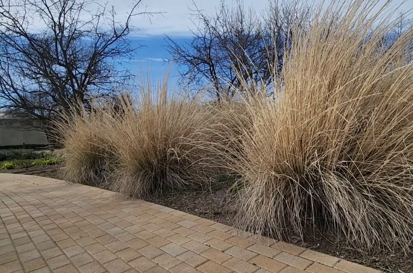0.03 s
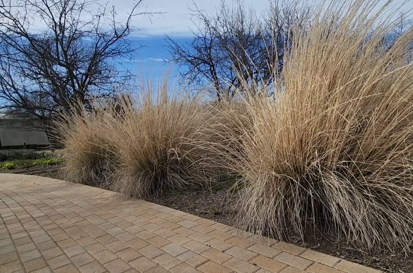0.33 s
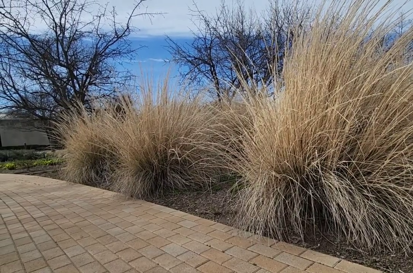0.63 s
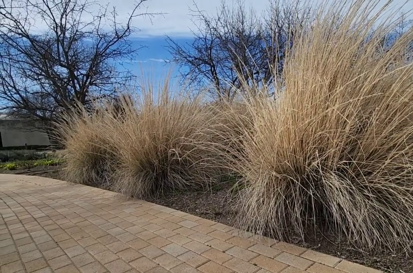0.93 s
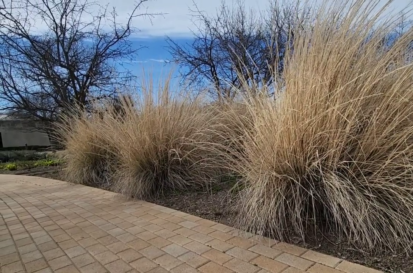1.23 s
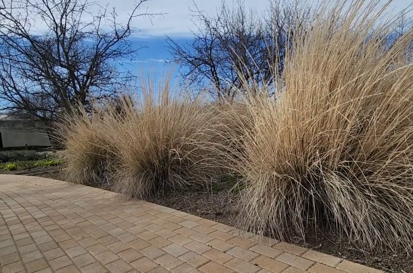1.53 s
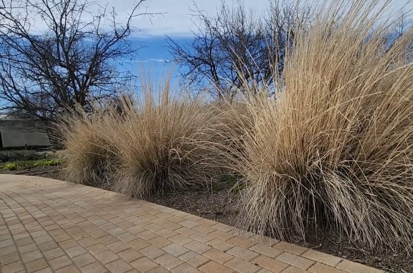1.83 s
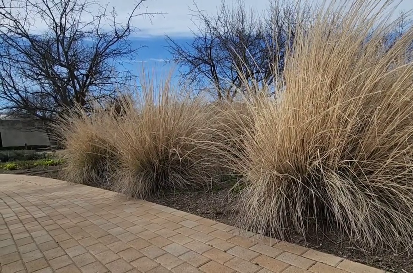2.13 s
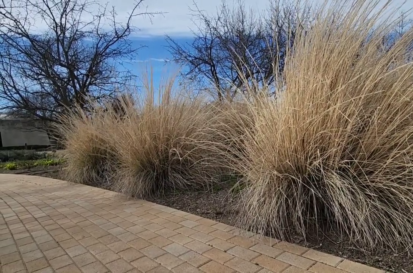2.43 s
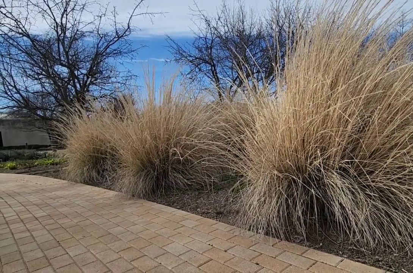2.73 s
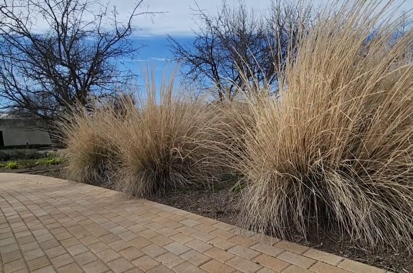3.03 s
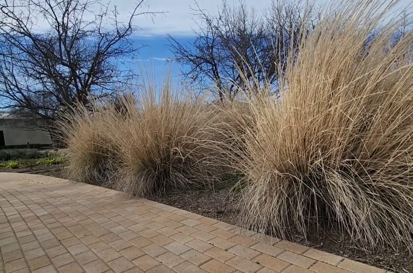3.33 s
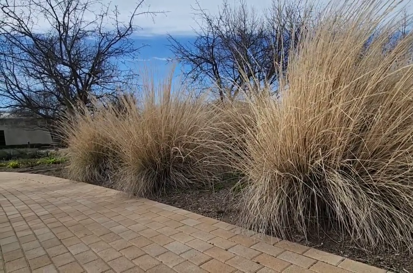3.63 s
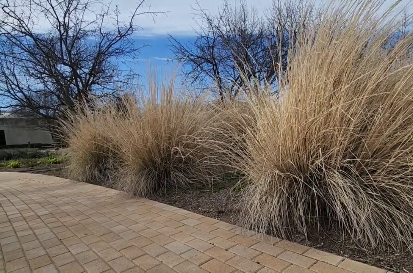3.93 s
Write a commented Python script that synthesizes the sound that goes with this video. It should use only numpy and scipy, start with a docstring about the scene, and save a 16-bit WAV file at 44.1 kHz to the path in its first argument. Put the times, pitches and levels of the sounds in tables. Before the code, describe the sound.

Dry grass hisses and crackles in light wind, stalks ticking, with faint traffic far away.

```python
"""Breeze in dry garden grass

Tall dry grass on the right hisses and crackles, louder as the wind picks up, and its stalks tick
as they snap against each other. A few faint knocks sound close by. Behind it all lie a thin hiss,
a low rumble, a wash of distant air and traffic, a far engine's fading drone and two faint whines."""
import sys
import numpy as np
from scipy import signal
from scipy.fft import rfft, irfft, next_fast_len
from scipy.io import wavfile
from scipy.ndimage import uniform_filter1d, map_coordinates

SR = 44100
rng = np.random.default_rng(int(sys.argv[2]) if len(sys.argv) > 2 else 0)


def int16_out(signal):
    """Quantize to a 16-bit WAV file."""
    q = np.round(np.clip(np.atleast_2d(signal).T, -1, 1) * 32767)
    wavfile.write(sys.argv[1], SR, q.astype(np.int16))


N = 176400  # 4 seconds


def amp(db):
    """Turn decibels into a factor to multiply by."""
    return 10 ** (np.asarray(db) / 20)


def unit(x):
    """Scale a signal to an average strength (rms) of 1."""
    return x / np.sqrt(np.mean(x ** 2) + 1e-20)


def along(points, hz):
    """Read between (f/Hz, value) points, with octaves evenly spaced."""
    f, v = np.transpose(points)
    return np.interp(np.log(hz + 1), np.log(f + 1), v)


def curve(rows):
    """Join (t/s, value) points into one value per sample."""
    return np.interp(np.arange(N) / SR, *np.transpose(rows))


def wobble(rate):
    """A smooth curve through `rate` random values a second."""
    return map_coordinates(rng.standard_normal(512), [np.arange(N) * rate / SR], mode="wrap")


def filtered(x, response):
    """Scale each frequency in x by response(hz)."""
    m = next_fast_len(N + SR // 2)
    return irfft(rfft(x, m) * response(np.fft.rfftfreq(m, 1 / SR)), m)[..., :N]


def pan(side_db):
    """Left and right gains of constant power; below 0 dB leans right."""
    gains = amp(np.array([[.5], [-.5]]) * side_db)
    return gains / np.sqrt(np.mean(gains ** 2, axis=0))


def patchy_noise(depth_db):
    """Two noises that share louder and softer patches in time and frequency."""
    cells = signal.stft(rng.standard_normal((2, N)), nperseg=512)[2]
    patches = uniform_filter1d(rng.standard_normal(cells.shape[1:]), size=14, axis=0)
    patches = unit(uniform_filter1d(patches, size=14, axis=1))
    return unit(signal.istft(cells * amp(depth_db * patches), nperseg=512)[1][:, :N])


def far_noise(spectrum, patchy_db):
    """Shaped noise of strength 1 reaching both ears from far off."""
    # how alike the two ears' sounds are: f/Hz, likeness (1 same, -1 opposite)
    likeness = [(60, .975), (140, .955), (250, .82), (350, .66), (470, .32), (660, .38), (820, 0),
                (1000, -.52), (1380, -.5), (1620, 0), (1900, .26), (2700, -.05), (4000, 0)]
    # where far sounds lean: f/Hz, left minus right/dB
    far_side = [(60, 0.57), (270, 0.084), (450, -1.4), (2000, -1.8)]

    def mid_and_side(hz):
        """Split each frequency into a shared and an opposite part."""
        angle = np.arccos(np.clip(along(likeness, hz), -1, 1)) / 2
        return amp(along(spectrum, hz)) * [np.cos(angle), np.sin(angle)]

    mid, side = filtered(patchy_noise(patchy_db), mid_and_side)
    ears = np.array([mid + side, mid - side])
    return unit(filtered(ears, lambda hz: pan(along(far_side, hz))))


def tone(hz, wander_hz, rate):
    """A pure tone of strength 1 with a wandering pitch."""
    pitch = hz + wander_hz * wobble(rate)
    return np.sqrt(2) * np.sin(2 * np.pi * np.cumsum(pitch) / SR)


def burst(spectrum, t, fade_s):
    """A stereo puff of noise that peaks near 1 and drops 60 dB in fade_s."""
    colour = amp(along(spectrum, np.fft.rfftfreq(len(t), 1 / SR)))
    puff = irfft(rfft(rng.standard_normal((2, len(t)))) * colour, len(t))
    return unit(puff) / 2 * np.exp(-np.log(1000) * t / fade_s)


def add(out, start_s, sound):
    """Mix a short sound in at start_s."""
    part = out[:, int(start_s * SR):][:, :sound.shape[-1]]
    part += sound[..., :part.shape[-1]]


def grass():
    """Dry blades hiss and crackle; more wind makes them louder and brush together more often."""
    # strength of the breeze: t/s, relative level/dB
    breeze = [(0, -69), (.35, -74), (.75, -65), (1.0, -59.5), (1.5, -59.5), (2.3, -59), (2.55, -57),
              (2.8, -57), (3.05, -55.5), (3.65, -57.5), (4, -55)]
    # tone colour of the blades: f/Hz, relative level/dB
    blade_colour = [(800, -5), (2000, -15), (3000, -3.5), (3700, -8), (5000, -9), (5700, -8.5), (6400, -5),
                    (6900, -6.5), (7400, -1), (8200, -3.5), (8900, -7), (10000, -7), (11000, -3.5),
                    (11550, 1), (12200, -4), (13200, -4.5), (15800, -6.5)]
    # where the grass stands: f/Hz, left minus right/dB
    blade_side = [(2000, -2.5), (3000, -11.5), (4000, -3.5), (4900, 1), (6300, -7.5), (7700, -12.5),
                  (9000, -7), (10200, -8), (11300, -8), (15000, -7.5)]
    peak_contacts_per_s, crackle_db, size_spread_db = 520, -12, 6
    boost_db, flutter_db = 1.5, .69
    breeze_db = curve(breeze)
    chance = peak_contacts_per_s / SR * amp(breeze_db - breeze_db.max())
    sizes = amp(size_spread_db * np.minimum(rng.exponential(size=(2, N)), 4))
    contacts = unit((rng.random((2, N)) < chance) * sizes)
    rustle = patchy_noise(depth_db=1.4) + amp(crackle_db) * contacts
    rustle = filtered(rustle, lambda hz: amp(along(blade_colour, hz)) * pan(along(blade_side, hz)))
    return unit(rustle) * amp(boost_db + breeze_db + flutter_db * wobble(30.25)) * np.sqrt(2)


def stalk_ticks():
    """Dry stalks snap brightly against each other; a thicker stalk adds a lower body."""
    # the snaps: t/s, rough peak level/dB, body against snap/dB
    snaps = [(0.400, -43, -22), (1.554, -37, -18), (2.221, -42, -15), (2.501, -39, -15), (2.666, -30, -7.5),
             (2.804, -39, -18), (3.000, -40, -15), (3.546, -39, -20), (3.613, -38, -18),
             (3.671, -29.5, -24)]
    # tone colour of the snap: f/Hz, relative level/dB
    snap_colour = [(3000, -35), (7000, -11), (10000, -8), (13000, 0), (16000, -1)]
    # tone colour of a thick stalk: f/Hz, relative level/dB
    body_colour = [(2000, -30), (3600, -3), (4800, 0), (6200, -8), (7500, -4), (10000, -25)]
    out, t = np.zeros((2, N)), np.arange(SR // 10) / SR
    for start_s, db, body_db in snaps:
        snap = burst(snap_colour, t, fade_s=.009)
        body = amp(body_db) * burst(body_colour, t, fade_s=.009)
        add(out, start_s, amp(db) * (snap + body))
    return out * pan(side_db=-8)


def knocks():
    """Each knock is a dull click, a gritty scrape and a short ring whose overtone dies sooner."""
    # small knocks nearby: t/s, rough peak level/dB, f/Hz, scrape against ring/dB
    hits = [(1.385, -35, 1570, -17), (3.091, -33.5, 525, -16.5), (3.329, -36, 420, -24),
            (3.980, -34, 482, -25)]
    # tone colour of the click: f/Hz, relative level/dB
    click_colour = [(200, -4), (550, 0), (1200, -7), (2500, -20), (6000, -40)]
    # tone colour of the scrape: f/Hz, relative level/dB
    scrape_colour = [(1000, -15), (3000, 0), (4500, -3), (6500, -9), (12000, -25)]
    rise_s, fade_s = .001, .026
    overtone_ratio, overtone_db, click_db = 2.29, -9, -6
    out, t = np.zeros((2, N)), np.arange(SR // 10) / SR
    fade = np.exp(-np.log(1000) * t / fade_s)
    for start_s, db, hz, scrape_db in hits:
        main = np.sin(2 * np.pi * hz * t) * fade
        overtone = np.sin(2 * np.pi * overtone_ratio * hz * t) * fade ** overtone_ratio
        ring = (main + amp(overtone_db) * overtone) * (1 - np.exp(-t / rise_s))
        click = amp(click_db) * burst(click_colour, t, fade_s=.027)
        scrape = amp(scrape_db) * burst(scrape_colour, t, fade_s=.09)
        add(out, start_s, amp(db) * (ring + click + scrape))
    return out * pan(side_db=-3)


def hiss():
    """A thin, even hiss on the right that stays when the grass is still."""
    # tone colour of the hiss: f/Hz, relative level/dB
    colour = [(1500, -19), (3000, -5), (5000, -18.5), (6400, -5.5), (7400, 1), (8900, -7), (10000, -15),
              (11550, -1), (12300, -7), (15800, -10)]
    # where it leans: f/Hz, left minus right/dB
    side = [(5000, -2.5), (7400, -13), (9500, -20), (15000, -20)]
    noise = rng.standard_normal((2, N))
    noise = filtered(noise, lambda hz: amp(along(colour, hz)) * pan(along(side, hz)))
    return amp(-61.5) * unit(noise)


def rumble(sway_db=1.2):
    """A low, far rumble that gently rises and falls."""
    # tone colour of the rumble: f/Hz, relative level/dB
    colour = [(15, -32), (26, -7), (40, -6.5), (56, 1), (80, -0.5), (120, -4), (150, -5.5), (200, -9.5),
              (250, -13), (320, -18.5), (420, -25), (700, -39), (1500, -89)]
    # its loudness: t/s, level/dB
    level = [(0, -37.5), (.8, -38), (1.1, -40.5), (1.35, -37.5), (1.9, -39.5), (2.3, -37.5), (2.7, -38.5),
             (3, -39), (3.5, -37), (3.8, -38.3), (4, -37)]
    return far_noise(colour, patchy_db=.5) * amp(curve(level) + sway_db * wobble(9))


def air_and_traffic(sway_db=.52):
    """Distant air and traffic blend into a nearly steady wash."""
    # tone colour of the wash: f/Hz, relative level/dB
    colour = [(150, -9.5), (350, -7), (480, -4.5), (680, 1), (850, 0), (1050, -1.5), (1350, -1.5),
              (1650, -6), (2000, -10), (2500, -16.5), (3500, -26), (6000, -53.5)]
    # its loudness: t/s, level/dB
    level = [(0, -49.5), (1.4, -49), (2.6, -49), (4, -49.5)]
    return far_noise(colour, patchy_db=.56) * amp(curve(level) + sway_db * wobble(5.45))


def far_engine():
    """An engine's unsteady drone fades away; its exhaust noise fades more slowly."""
    # tone colour of the exhaust: f/Hz, relative level/dB
    exhaust_colour = [(50, -36), (85, -1), (105, 4.5), (125, 3.5), (160, -8), (240, -11.5), (400, -48.5)]
    start_db, sway_db = -37.5, 3.5
    drone_fade_db_per_s, exhaust_fade_db_per_s = 5, 2.43
    t = np.arange(N) / SR
    drone = tone(hz=100.2, wander_hz=3.985, rate=14)
    drone *= amp(sway_db * wobble(14) - drone_fade_db_per_s * t)
    exhaust = far_noise(exhaust_colour, patchy_db=-.2) * amp(-.5 - exhaust_fade_db_per_s * t)
    return amp(start_db) * (drone + exhaust)


def far_whines(sway_db=4.1):
    """Two faint, wavering whines: one swells and fades, the other slowly grows."""
    # the whines: f/Hz, level at the top of the swell/dB, top at t/s, swell width/s
    whines = [(541.7, -66.5, 1.2, 1.1), (671.5, -70.5, 4.7, 3.9)]
    out, t = np.zeros(N), np.arange(N) / SR
    for hz, db, top_s, width_s in whines:
        swell = np.exp(-.5 * ((t - top_s) / width_s) ** 2)
        out += tone(hz, wander_hz=2.89, rate=12) * amp(db + sway_db * wobble(7.86)) * swell
    return out


def scene():
    """The grass and its background, with ticks and knocks on top."""
    garden = grass() + hiss() + rumble() + air_and_traffic() + far_engine() + far_whines()
    return garden + stalk_ticks() + knocks()


def record(dry):
    """Cut off the very highest treble."""
    return filtered(dry, lambda hz: hz < 15800)


dry = scene()
out = record(dry)
int16_out(out)
```